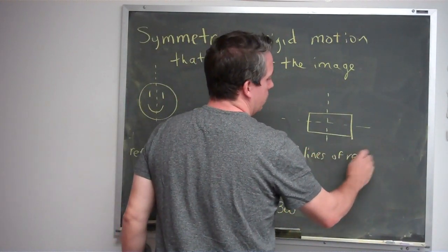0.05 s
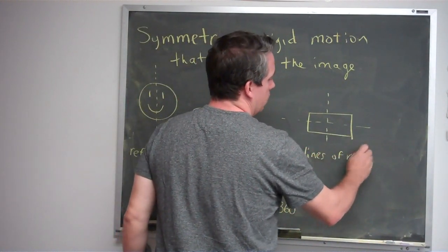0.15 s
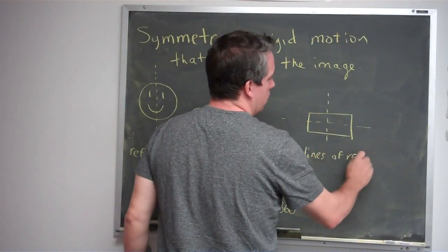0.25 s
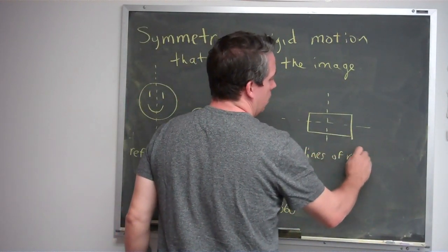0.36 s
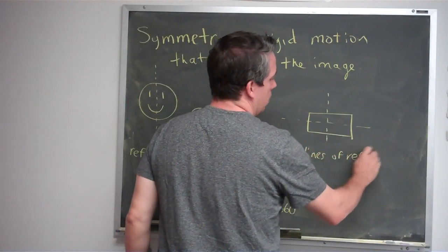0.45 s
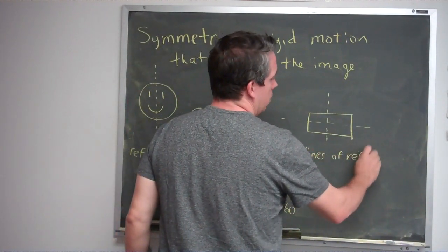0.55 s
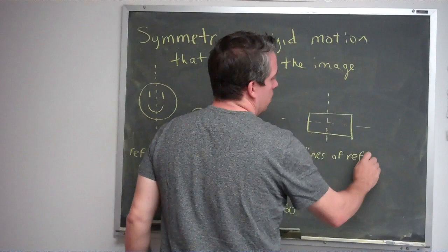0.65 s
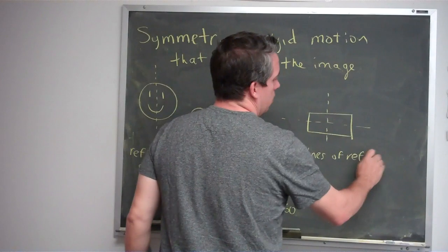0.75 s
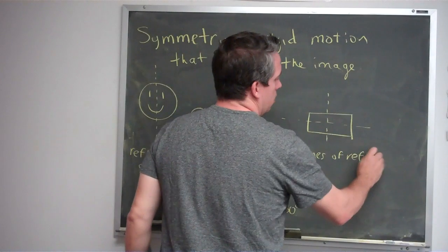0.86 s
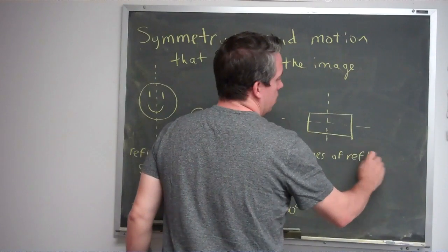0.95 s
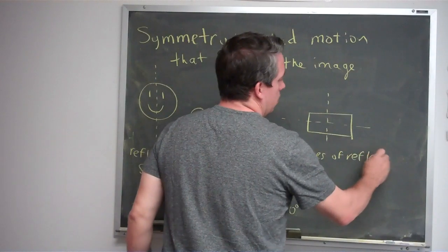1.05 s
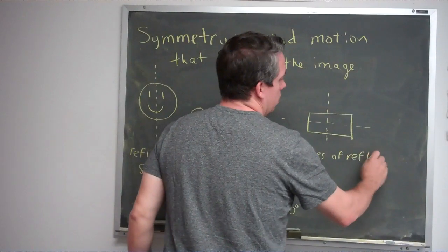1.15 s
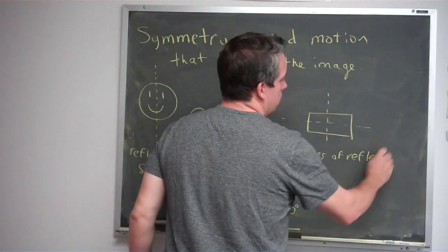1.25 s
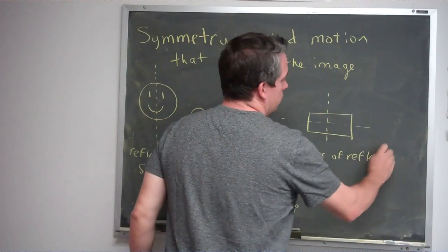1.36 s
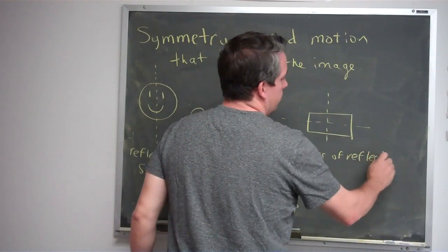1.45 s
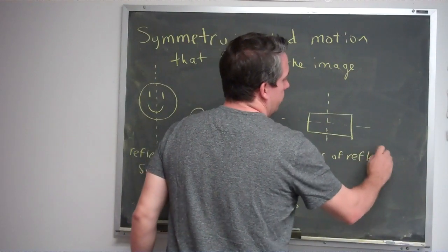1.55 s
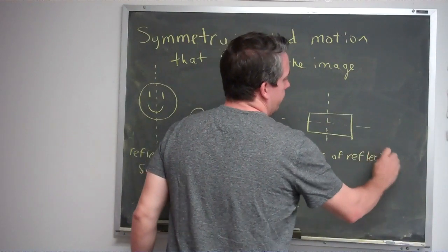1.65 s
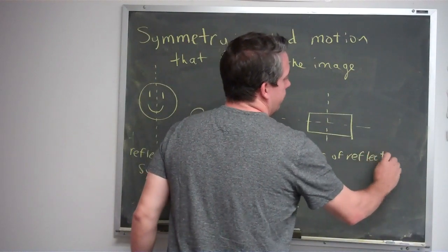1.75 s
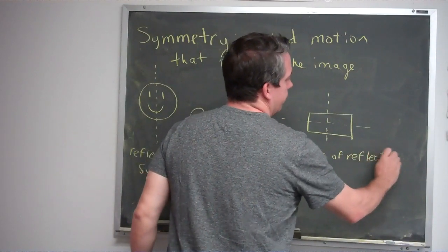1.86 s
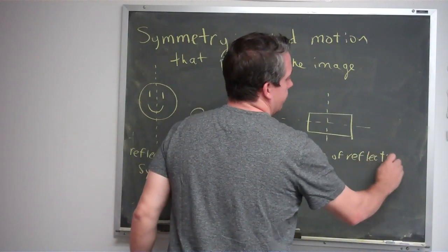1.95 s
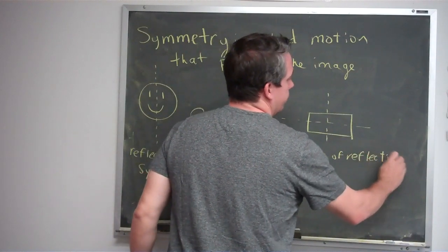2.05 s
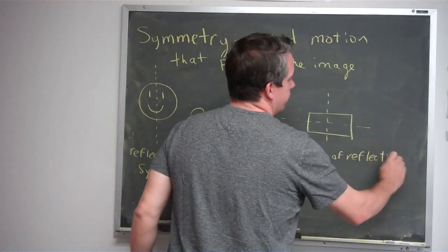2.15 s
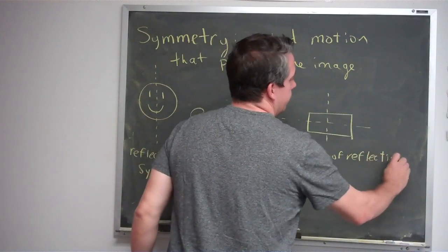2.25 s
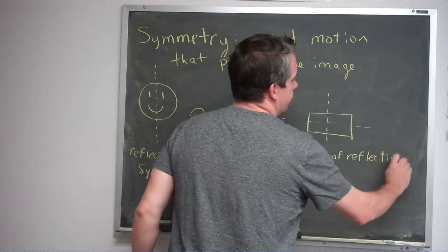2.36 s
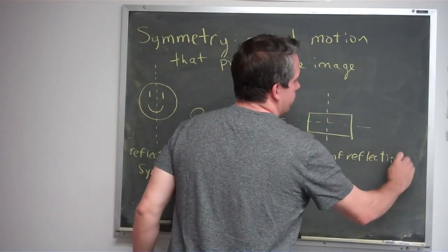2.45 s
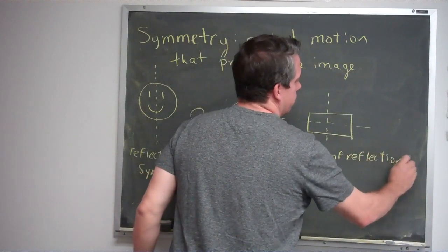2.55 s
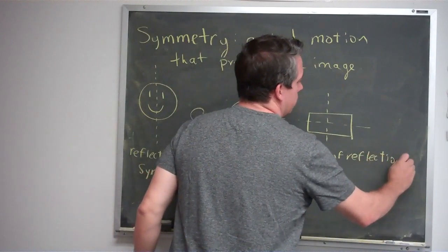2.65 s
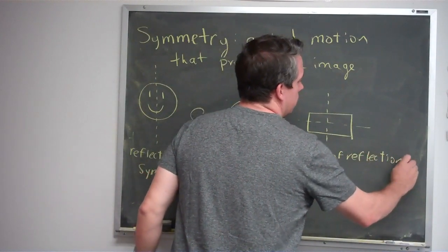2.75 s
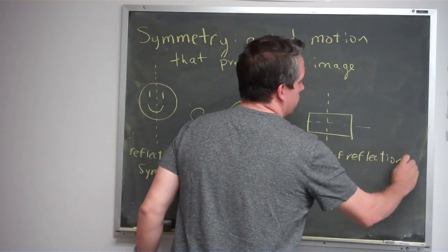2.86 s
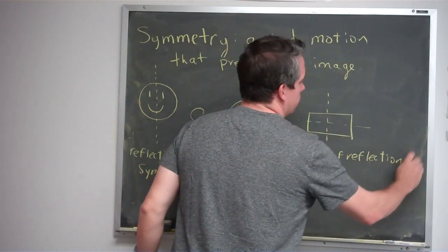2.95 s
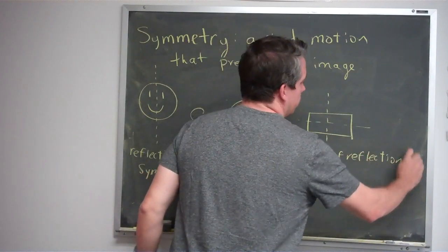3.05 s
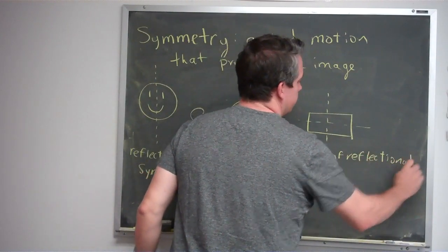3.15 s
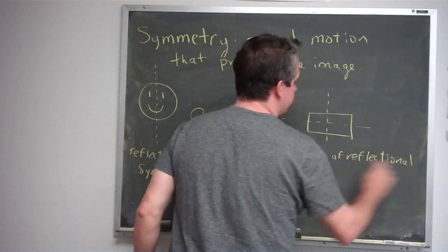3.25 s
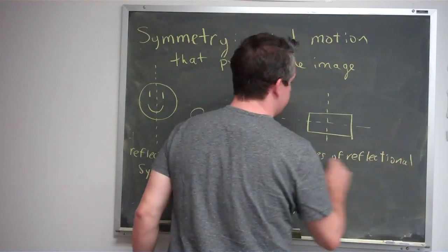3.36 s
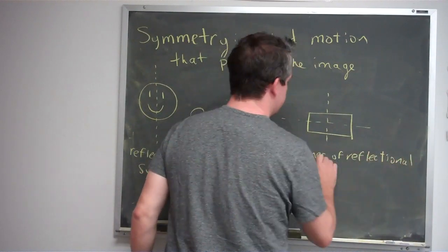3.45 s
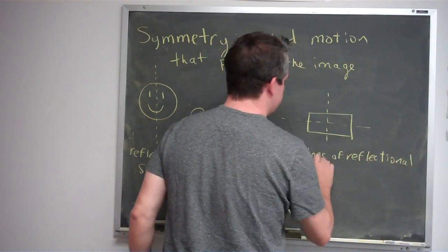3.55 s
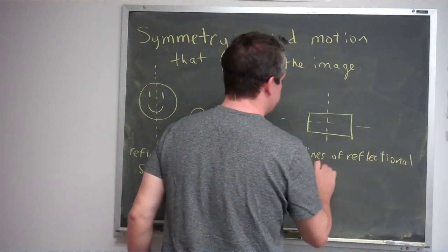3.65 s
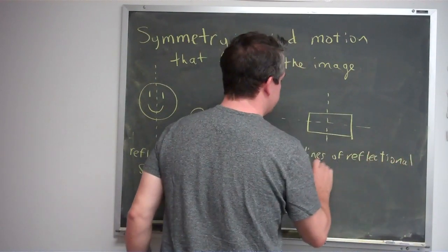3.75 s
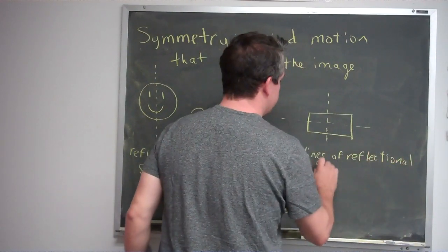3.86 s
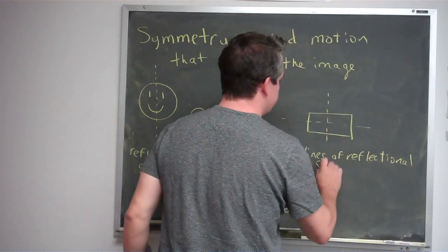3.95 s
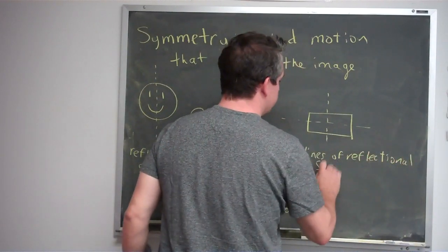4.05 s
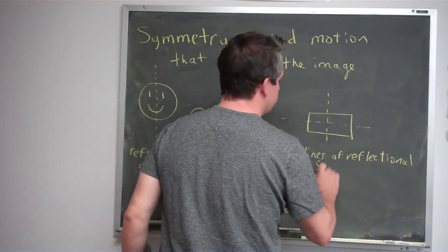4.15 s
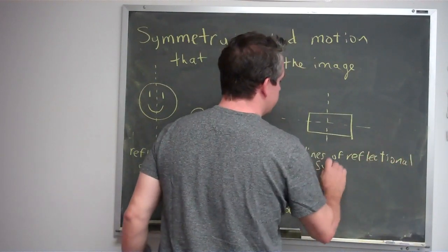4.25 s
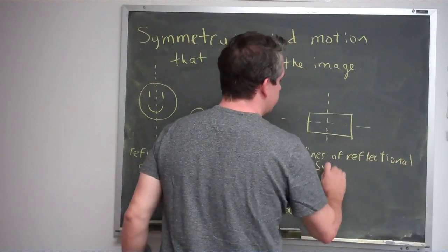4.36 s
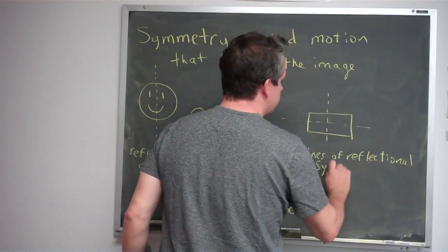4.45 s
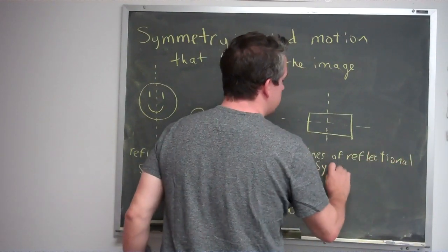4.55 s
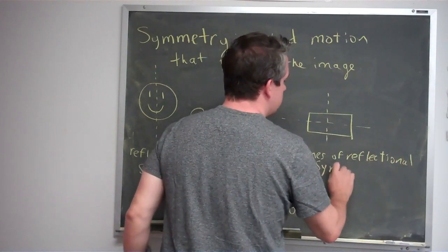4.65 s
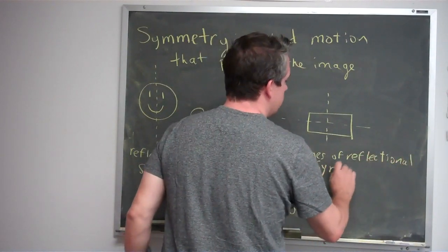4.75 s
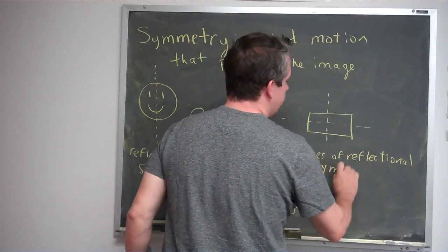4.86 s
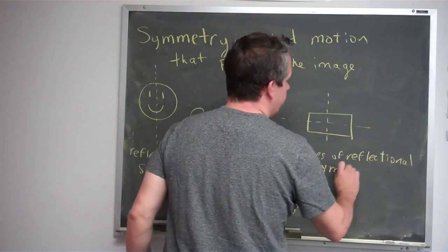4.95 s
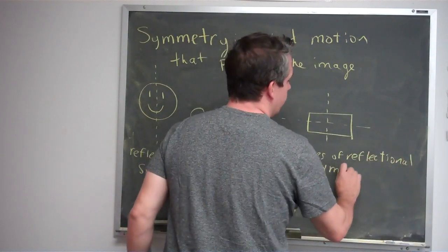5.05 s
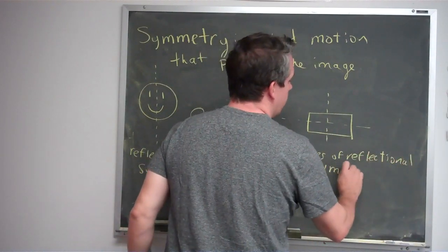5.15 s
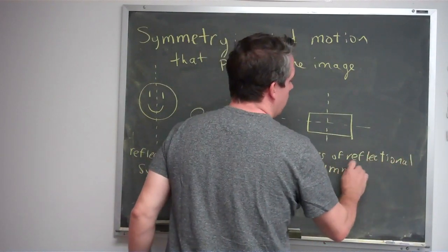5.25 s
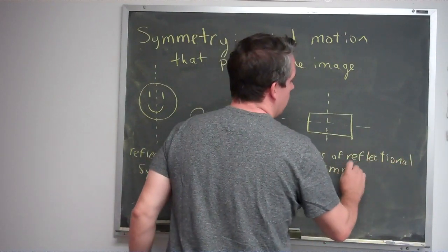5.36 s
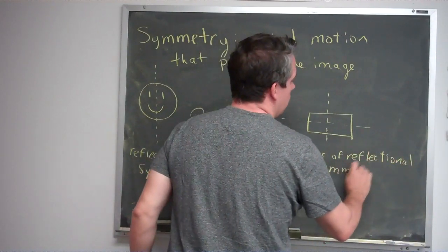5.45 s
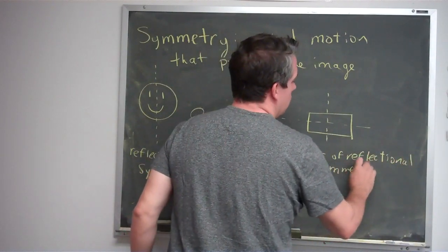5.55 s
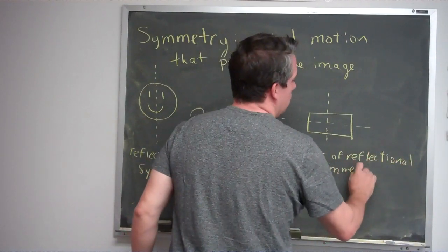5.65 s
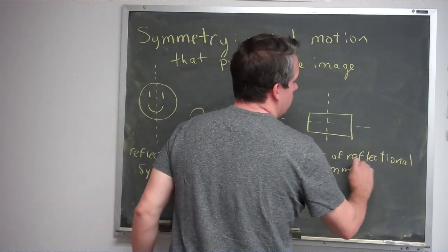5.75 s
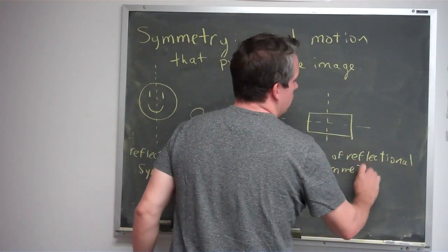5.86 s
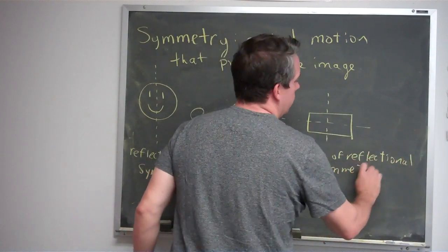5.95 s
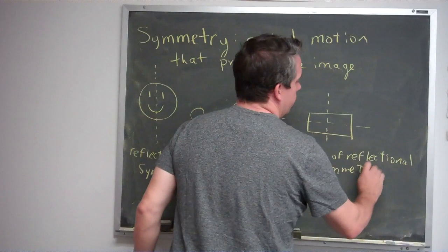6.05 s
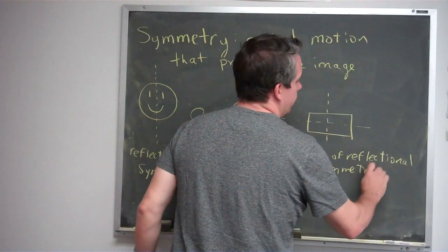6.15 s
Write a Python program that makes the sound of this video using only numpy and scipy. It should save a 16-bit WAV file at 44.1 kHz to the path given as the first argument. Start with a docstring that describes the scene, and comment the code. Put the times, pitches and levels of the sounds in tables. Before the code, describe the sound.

Someone writes on a chalkboard with uneven, sharp taps and light scratches, while ventilation hums and a faint, thin whistle wavers.

```python
"""A small, quiet lecture room, heard from a camera microphone behind someone at a wall-hung chalkboard.
Ventilation hums from the start. Each letter opens with a sharp tap that rings the panel, differently
from place to place; the chalk then drags faintly and scrapes where it bites. About a second in, a thin
high whistle joins. Past halfway a sleeve brushes as the arm swings back, and a second line is written."""
import sys
import numpy as np
from scipy import signal
from scipy.fft import rfft, irfft, next_fast_len
from scipy.io import wavfile
from scipy.ndimage import map_coordinates

SR = 44100
rng = np.random.default_rng(int(sys.argv[2]) if len(sys.argv) > 2 else 0)


def to_wav(sig):
    """Store sig (one row per channel, or 1-D mono) as 16-bit WAV at the path in sys.argv[1].

    Samples outside -1..1 are clipped; the rate is SR.
    """
    pcm = np.clip(np.atleast_2d(sig), -1, 1) * 32767
    pcm = np.round(pcm).astype(np.int16)
    wavfile.write(sys.argv[1], SR, pcm.T)  # frames by channels


N = 273861
TIME = np.arange(N) / SR
LIFT_S = 0.061  # the chalk leaves the board this long before it lands again

# Chalk landing on the board: start_s, gain_db, corner_hz, crack_db, knock_db
LANDINGS = [(0.2372, 14, 2080, -16, 0.5), (0.5, 10.5, 4050, -14.5, -1.5), (0.6393, 11, 2460, -21, 3),
            (0.842, 5.5, 1840, -27.5, 1.5), (1.1915, 13, 3010, -14.5, -0.5), (1.449, 15.5, 4400, -11, 0),
            (1.6872, 13, 3220, -15, 1.5), (1.7864, 3, 3180, -14.5, -1.5), (1.9469, 14, 1530, -20, -2),
            (2.052, 13, 3400, -16, -2.5), (2.3637, 7.5, 2400, -23, 3.5), (2.7202, 12.5, 2700, -21, 0),
            (3.1411, 15, 2780, -18.5, 1), (3.6072, 9, 2660, -20.5, 4.5), (3.964, 13.5, 3460, -18.5, 0.5),
            (4.3655, 9.5, 3340, -9, -1), (4.9358, 10, 4640, -14, 0.5), (5.662, 11.5, 3020, -14.5, 0),
            (5.8604, 11, 2860, -22.5, 1), (6.1683, 9, 2450, -14.5, 1.5)]
# Panel modes: pitch_hz, then strength_db for a tap at each of four places across the board
PANEL_MODES = [(436, 4.0, 0.0, -8.0, -11.0), (511, 0.0, 5.0, 4.0, -3.0), (598, -2.0, 7.0, 10.0, 11.0),
               (673, 2.0, -11.0, -11.0, -11.0), (797, 2.0, 0.0, -9.0, -11.0), (834, -11.0, -11.0, 1.0, 3.0),
               (877, -1.0, -11.0, -2.0, 3.0), (1023, 2.0, 2.0, -6.0, 1.0), (1061, 4.0, -0.0, -6.0, 2.0),
               (1141, 5.0, -11.0, 3.0, -11.0), (1276, -8.0, -11.0, 1.0, 3.0),
               (1335, -11.0, -6.0, -11.0, 3.0), (1378, -11.0, -2.0, 5.0, -3.0),
               (1427, -11.0, -11.0, -5.0, 5.0), (1561, 4.0, -2.0, -4.0, 1.0), (1707, -4.0, -3.0, 4.0, -8.0),
               (1766, -7.0, -1.0, 2.0, -7.0), (1825, -6.0, 3.0, -2.0, -11.0), (1981, 2.0, -2.0, -1.0, -8.0),
               (2030, 5.0, -3.0, -0.0, -11.0), (2229, 3.0, -2.0, -0.0, -11.0), (2536, 2.0, 1.0, -4.0, 1.0),
               (2595, 3.0, 3.0, -8.0, -1.0), (2643, 4.0, 4.0, -4.0, 1.0), (2762, 7.0, 3.0, -4.0, -5.0),
               (3117, 2.0, 2.0, 1.0, -3.0), (3316, 2.0, 3.0, -3.0, -2.0), (3359, 1.0, 3.0, -2.0, 3.0)]
# What the panel radiates into the room: frequency_hz, gain_db
RADIATION = [(60, -30), (170, -11.5), (370, -13.5), (430, 2), (750, 4.5), (1100, 9), (1700, 12), (2600, 10),
             (3600, 10), (5000, 3.5), (6500, 7.5), (8200, 2.5), (10000, -14), (13000, -24.5)]
# The two lines of writing: start_s, end_s, start_place_widths (0-1 across the board)
WRITTEN_LINES = [(0, 3.27, 0.75), (3.6, 5.8, 0.61)]


def amp(db):
    """Decibels to gain."""
    return 10 ** (np.asarray(db) / 20)


def unit(x):
    """Scale to rms 1."""
    return x / np.sqrt(np.mean(x ** 2) + 1e-20)


def along(points, hz):
    """Read (frequency_hz, value) points on a log frequency axis."""
    frequencies, values = np.transpose(points)
    return np.interp(np.log(hz + 1), np.log(frequencies + 1), values)


def wobble(rate):
    """A smooth random curve, rate knots a second."""
    return map_coordinates(rng.standard_normal(int(N * rate / SR) + 4), [TIME * rate])


def swell(middle_s, length_s):
    """A gain that rises and falls once, as half a cosine."""
    return np.cos(np.pi * np.clip((TIME - middle_s) / length_s, -.5, .5))


def filtered(x, gain):
    """Zero-phase filter by a gain of frequency."""
    size = next_fast_len(x.shape[-1] + SR // 4)
    return irfft(rfft(x, size) * gain(np.fft.rfftfreq(size, 1 / SR)), size)[..., :x.shape[-1]]


def coloured(x, gain, size=32768):
    """Causal filter by a gain of frequency: nothing sounds before the blow."""
    cepstrum = irfft(np.log(np.maximum(gain(np.fft.rfftfreq(size, 1 / SR)), 1e-6)))
    cepstrum[1:size // 2] *= 2
    cepstrum[size // 2 + 1:] = 0
    return irfft(rfft(x, size) * np.exp(rfft(cepstrum)))[..., :x.shape[-1]]


def port_noise(n, apart_hz):
    """White noise at the microphone's two close ports: alike in the bass, unrelated far above apart_hz."""
    turn = lambda hz: np.arccos(1 / (1 + (hz / apart_hz) ** 2)) / 2
    shares = lambda hz: np.array([np.cos(turn(hz)), np.sin(turn(hz))])
    mid, side = filtered(rng.standard_normal((2, n)), shares)
    return np.array([mid + side, mid - side])


def tone(hz):
    """A sine of rms 1 that follows a pitch curve."""
    return np.sqrt(2) * np.sin(2 * np.pi * np.cumsum(hz) / SR)


def ripple(hz, depth_db, spacing_hz):
    """Paths of different lengths interfere: random hills and notches in the spectrum, mean power 1."""
    knots = rng.standard_normal(SR // 50)
    return unit(amp(depth_db * map_coordinates(knots, [hz / spacing_hz])))


def ventilation():
    """Room tone: duct rumble and soft hiss, with a few steady tones."""
    # Moving air: frequency_hz, gain_db
    air_spectrum = [(25, -33), (60, -18), (95, -14.5), (150, -8), (205, 0.5), (320, -15), (450, -10.5),
                    (900, -19), (2400, -23.5), (5000, -28.5), (6400, -27.5), (7600, -25), (9500, -37),
                    (14000, -39)]
    # Fan tones and a faint electric whine: pitch_hz, level_db, wander_hz
    hum_tones = [(120.9, -58, 0.24), (204.9, -58, 1.96), (360.6, -65, 0.43), (11840, -80, 3.8)]
    air = filtered(port_noise(N, apart_hz=1310), lambda hz: amp(along(air_spectrum, hz)))
    air *= amp(-27.5 + 0.095 * wobble(2.6))
    hum = sum(amp(db) * tone(hz + wander_hz * wobble(12)) for hz, db, wander_hz in hum_tones)
    return air + hum


def whistle(pitch_hz=6860, drift_hz=22, flutter_hz=45, flicker_db=1.5, gain_db=7, attack_s=0.11):
    """A thin, unsteady whistle swells and fades; the room makes it flicker differently at each port."""
    # Its rise and fall: time_s, relative_db
    contour = [(1.1, -61), (1.23, -61), (1.37, -53.5), (1.55, -51.5), (1.77, -61.5), (2.11, -58.5),
               (2.47, -59.5), (2.99, -57), (3.11, -60), (3.5, -59.5), (3.99, -70), (4.26, -66), (4.53, -55),
               (4.67, -63.5), (5.04, -62), (5.14, -64.5), (5.73, -70), (6.21, -73)]
    contour_db = np.interp(TIME, *np.transpose(contour)) + 0.9 * wobble(18)
    onset = np.clip((TIME - contour[0][0]) / attack_s, 0, 1)
    pitch = pitch_hz + drift_hz * wobble(4.6)
    ports = [tone(pitch + flutter_hz * wobble(200)) * amp(flicker_db * wobble(30)) for _ in range(2)]
    return onset * amp(contour_db + gain_db) * unit(np.array(ports))


def sleeve(level_db=-55.5, centre_hz=6500):
    """Cloth brushes faintly as the arm swings back to a new line."""
    band = lambda hz: 1 / (1 + (np.log2((hz + 1) / centre_hz) / 0.41) ** 4)
    swish = filtered(port_noise(N, apart_hz=2200), band)
    return amp(level_db) * swell(middle_s=3.5, length_s=0.25) * unit(swish)


def board_sway(gain_db=-75, t60_s=1.0, centre_hz=58):
    """Each push of the hand rocks the whole board on the wall: a soft, deep thud."""
    push = np.zeros(N)
    for start_s, tap_db, _, _, knock_db in LANDINGS:
        push += (TIME >= start_s) * amp(tap_db + knock_db - 60 * np.abs(TIME - start_s) / t60_s)
    band = lambda hz: 1 / (1 + np.log2((hz + 1) / centre_hz) ** 4)
    boom = filtered(port_noise(N, apart_hz=127), band)
    return amp(gain_db) * push * unit(boom)


def friction(n, scrape_db, centre_hz, hiss_db, grain_db=2.0, width_octaves=0.43, grains_per_s=380):
    """Sliding chalk crumbles in uneven grains: they shake the panel softly and hiss as powder."""
    # Powder hiss: frequency_hz, gain_db
    powder_spectrum = [(1500, -28), (3500, -3), (5000, -2), (6500, 4.5), (8000, 2), (10000, -11.5),
                       (14000, -15)]
    size = max(n, SR // 3)
    grains = map_coordinates(rng.standard_normal(SR // 50), [TIME[:size] * grains_per_s])
    crumbs = port_noise(size, apart_hz=2200) * amp(grain_db * grains)
    band = lambda hz: 1 / np.sqrt(1 + (np.log2((hz + 1) / centre_hz) / width_octaves) ** 4)
    panel = lambda hz: amp(along(RADIATION, hz)) * ripple(hz, depth_db=3.5, spacing_hz=127.2)
    scrape = amp(scrape_db) * unit(filtered(crumbs, lambda hz: band(hz) * panel(hz)))
    hiss = amp(hiss_db) * unit(filtered(crumbs, lambda hz: amp(along(powder_spectrum, hz))))
    return (scrape + hiss)[:, :n]


def drags(swing_s=0.131, swing_db=0.5, release_s=0.044):
    """The chalk slides up and down, swelling with its speed, until the letter or the line ends."""
    out = np.zeros((2, N))
    starts = [0] + [row[0] for row in LANDINGS]
    for start_s, next_s in zip(starts, starts[1:] + [np.inf]):
        line_ends = [end_s for _, end_s, _ in WRITTEN_LINES if end_s > start_s]
        stop_s = min([next_s - LIFT_S] + line_ends)
        touching = (TIME >= start_s) & (TIME < stop_s)
        t = TIME[touching] - start_s
        swing = amp(swing_db * np.cos(2 * np.pi * t / swing_s))
        release = np.clip((stop_s - start_s - t) / release_s, 0, 1)
        slide = friction(len(t), scrape_db=-58, centre_hz=2250, hiss_db=-58)
        out[:, touching] += swing * release * slide
    return out


def scrapes():
    """Where the chalk bites harder, its friction swells up briefly."""
    # Bites: middle_s, length_s, scrape_db, centre_hz, hiss_db
    bites = [(0.01, 0.094, -52.5, 1510, -59), (1.088, .08, -61, 1600, -60), (2.879, .12, -54.5, 1140, -68),
             (3.222, .066, -56, 2200, -50), (3.724, .12, -54, 2310, -52), (4.197, 0.085, -47.5, 2500, -53),
             (4.269, 0.088, -52.5, 850, -79), (4.856, 0.048, -65, 1000, -78),
             (5.456, .15, -49.5, 2280, -56.5), (5.578, 0.066, -53.5, 900, -72),
             (6.101, .08, -54, 1730, -58)]
    out = np.zeros((2, N))
    for middle_s, length_s, scrape_db, centre_hz, hiss_db in bites:
        biting = np.abs(TIME - middle_s) < length_s / 2
        scrape = friction(biting.sum(), scrape_db, centre_hz, hiss_db)
        out[:, biting] += swell(middle_s, length_s)[biting] * scrape
    return out


def place_at(time_s, widths_per_s=0.061):
    """Where the hand is across the board: it moves evenly to the right along each line."""
    start_s, _, start_place = [line for line in WRITTEN_LINES if line[0] <= time_s + LIFT_S][-1]
    return start_place + widths_per_s * (time_s - start_s)


def mode_strengths(place, scatter_db=0.5):
    """Each mode answers as strongly as its shape is at this place (dB, one row per mode)."""
    # The four places of PANEL_MODES across the board: place_widths
    places = [.66, .78, .86, .93]
    mode_db = np.array([[np.interp(place, places, row[1:])] for row in PANEL_MODES])
    return mode_db + scatter_db * rng.standard_normal(mode_db.shape)


def mode_clusters(hz, mode_db, relative_width=0.018, cluster_db=-6.0):
    """Weaker modes crowd around each strong one and lift the spectrum there."""
    mode_hz = np.array(PANEL_MODES)[:, :1]
    power = amp(mode_db + cluster_db) ** 2 / (1 + ((hz / mode_hz - 1) / relative_width) ** 4)
    return np.sqrt(1 + power.sum(0))


def first_waves(t, decay_s=0.0027, echo_s=0.0035, echo_db=9):
    """Bending waves leave the contact in a short burst; a second burst returns from the frame."""
    burst = lambda age: (age >= 0) * np.exp(-np.abs(age) / decay_s)
    envelope = burst(t) + amp(echo_db) * burst(t - echo_s)
    return port_noise(len(t), apart_hz=5000) * envelope / np.linalg.norm(envelope)


def dense_ring(t):
    """The crowded upper modes and the room die away together, each band at its own speed."""
    # Decay of panel and room: frequency_hz, t60_s
    ring_times = [(150, 0.61), (500, 0.26), (1200, 0.23), (3000, .2), (8500, 0.25), (13000, 0.15)]
    hz, age_s, bands = signal.stft(port_noise(len(t), apart_hz=2080), SR, nperseg=256)
    decay = amp(-60 * age_s / along(ring_times, hz)[:, None])
    tail = signal.istft(bands * decay, SR, nperseg=256)[1][:, :len(t)]
    return unit(tail) / np.sqrt(len(t))


def ringing_modes(t, mode_db, t60_s=0.18, port_phase_rad=0.29):
    """Single modes ring on as decaying sines; the low ones ring loudest."""
    hz = np.array(PANEL_MODES)[:, :1]
    tilt_db = along([(500, 4.5), (620, 4.0), (900, 0.5), (1700, -0.5), (3300, -6.5)], hz)
    life_s = t60_s / np.log(1000)
    phase = rng.uniform(0, 2 * np.pi, hz.shape)
    # short waves reach the two ports out of step
    port_shift = port_phase_rad * (hz / hz.max()) ** 2.4 * rng.standard_normal((2, *hz.shape))
    sines = amp(mode_db + tilt_db) * np.sin(2 * np.pi * hz * t + phase + port_shift)
    return sines.sum(1) * np.exp(-t / life_s) * 2 / (life_s * SR)


def tap(place, corner_hz, crack_db, knock_db):
    """One landing: harder contact is shorter and brighter, grains crack, the hand's weight knocks."""
    # The highest waves are damped on their first trip, so the burst holds most: frequency_hz, gain_db
    burst_share = [(600, -10.5), (1200, -12), (2500, -6), (8000, -4.5), (12000, -2.5)]
    t = np.arange(SR // 3) / SR
    mode_db = mode_strengths(place)
    direct = first_waves(t) * (corner_hz / 3000) ** 0.36
    direct = coloured(direct, lambda hz: amp(along(burst_share, hz)))
    peaks = lambda hz: mode_clusters(hz, mode_db) * ripple(hz, depth_db=1.65, spacing_hz=171.6)
    crowd = coloured(direct + amp(-3) * dense_ring(t), peaks)
    panel = crowd + ringing_modes(t, mode_db)
    contact = lambda hz: np.sqrt(1 / (1 + (hz / corner_hz) ** 7) + amp(crack_db) ** 2)
    weight = lambda hz: amp(knock_db / (1 + (hz / 950) ** 4))
    return coloured(panel, lambda hz: amp(along(RADIATION, hz)) * contact(hz) * weight(hz))


def taps():
    """Every landing of the chalk rings the panel from the place the hand has reached."""
    out = np.zeros((2, N + SR))
    for start_s, gain_db, corner_hz, crack_db, knock_db in LANDINGS:
        hit = amp(gain_db) * tap(place_at(start_s), corner_hz, crack_db, knock_db)
        first = round(start_s * SR)
        out[:, first:first + hit.shape[1]] += hit
    return out[:, :N]


def scene():
    """Chalk on the board over the room tone, heard from behind the writer."""
    return taps() + board_sway() + drags() + scrapes() + sleeve() + ventilation() + whistle()


def record(dry, ceiling=0.95, top_hz=14600):
    """Each port colours the treble its own way; the camera rounds off peaks and cuts the top treble."""
    # The two microphone ports resonate at different pitches: frequency_hz, left_minus_right_db
    port_balance = [(1000, 0.33), (4500, -0.4), (5500, -1), (6400, -8.5), (7000, 4.5), (7700, 16.5),
                    (8500, 7), (10000, 8), (12500, 2)]
    heard = filtered(dry, lambda hz: amp(np.outer([0.5, -0.5], along(port_balance, hz))))
    rounded = heard / (1 + np.abs(heard / ceiling) ** 8) ** (1 / 8)
    return filtered(rounded, lambda hz: 1 / np.sqrt(1 + (hz / top_hz) ** 80))


dry = scene()
out = record(dry)
to_wav(out)
```